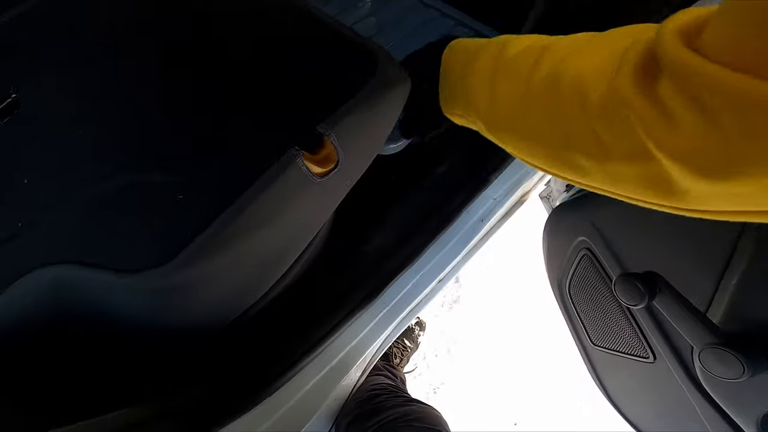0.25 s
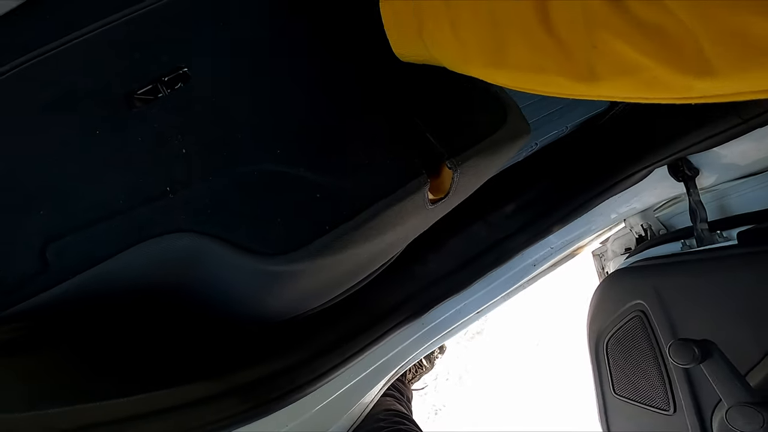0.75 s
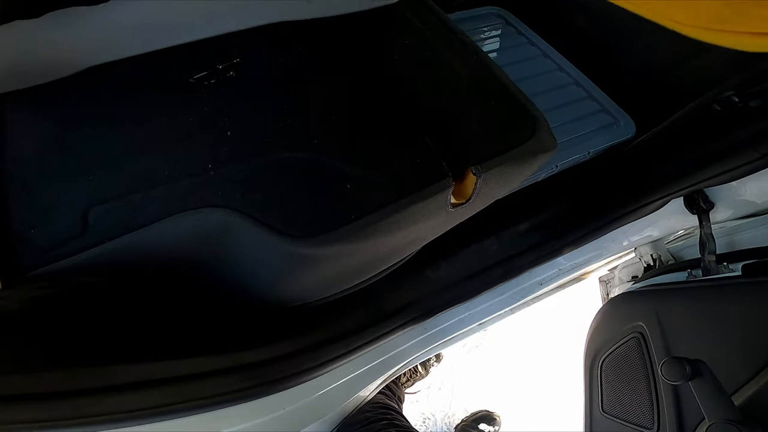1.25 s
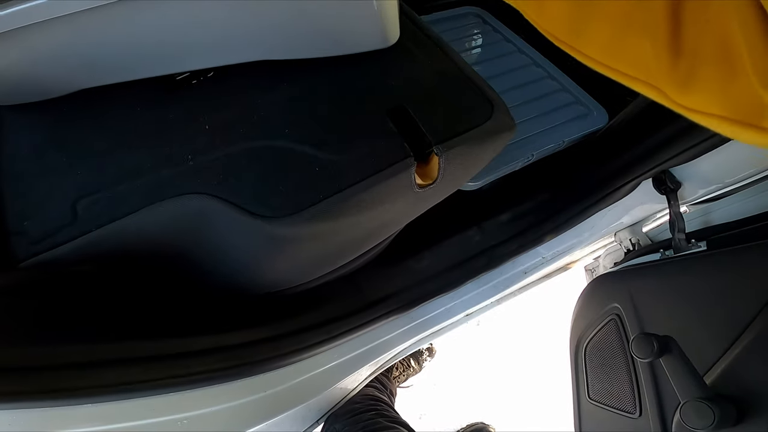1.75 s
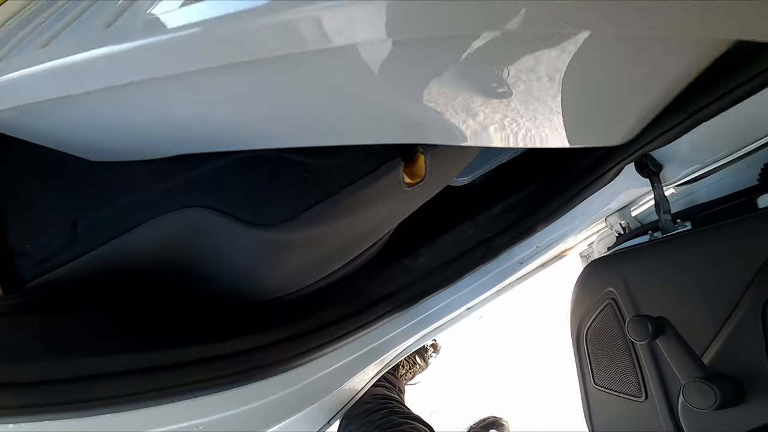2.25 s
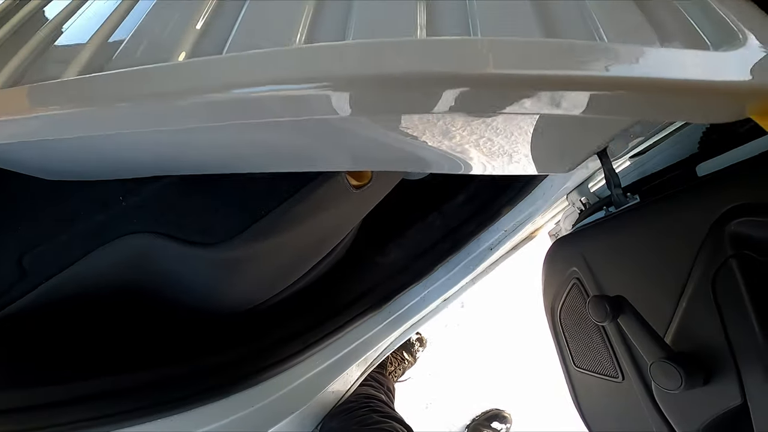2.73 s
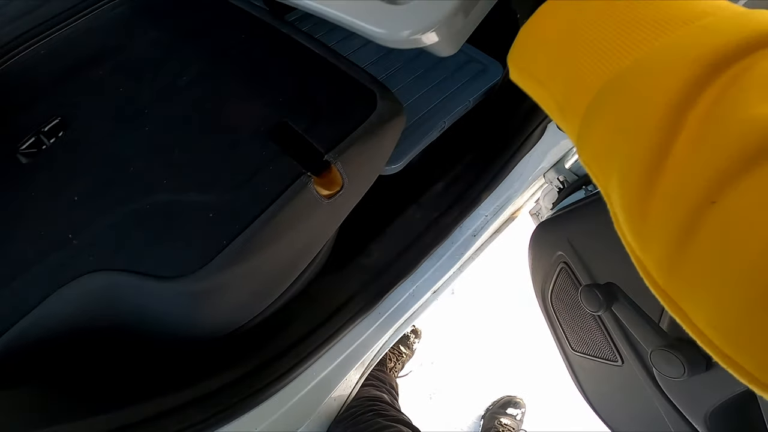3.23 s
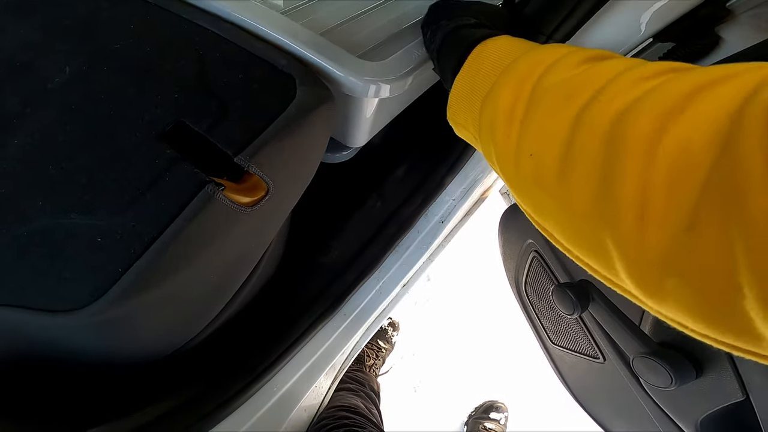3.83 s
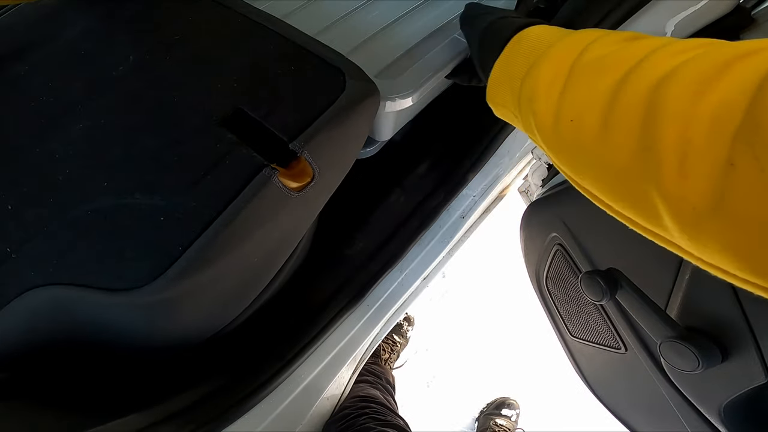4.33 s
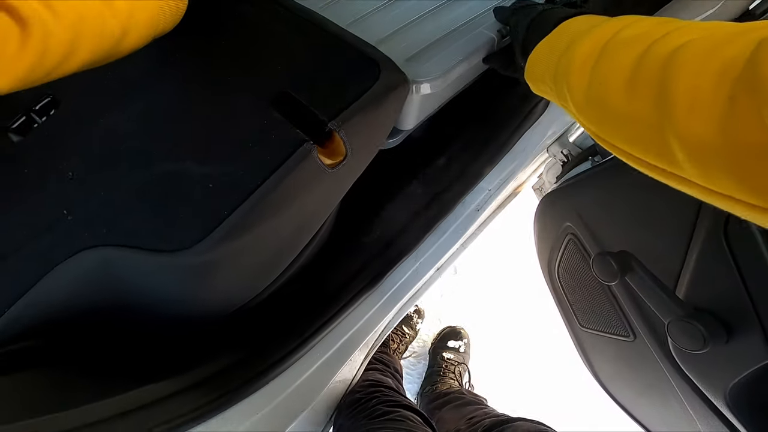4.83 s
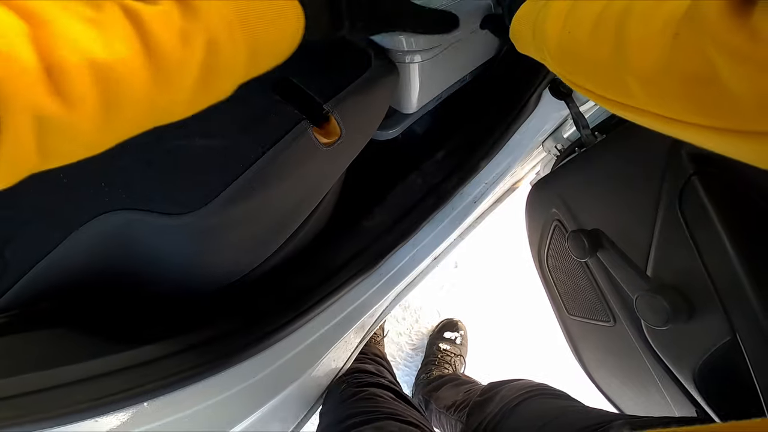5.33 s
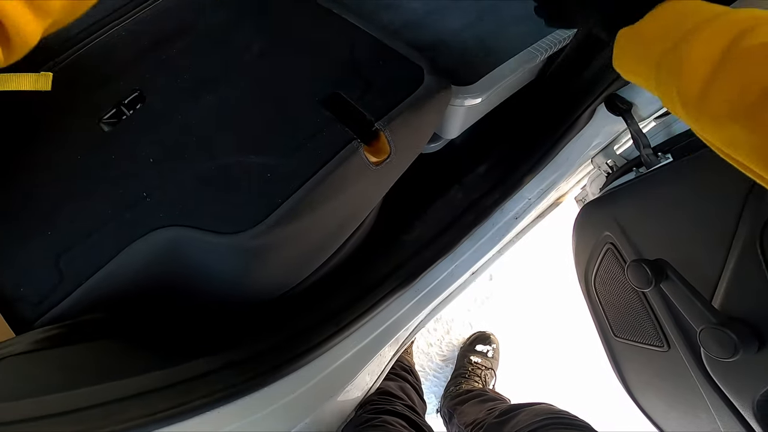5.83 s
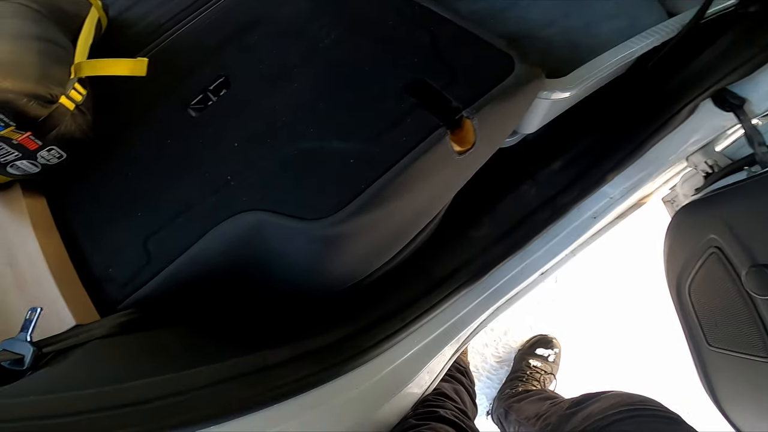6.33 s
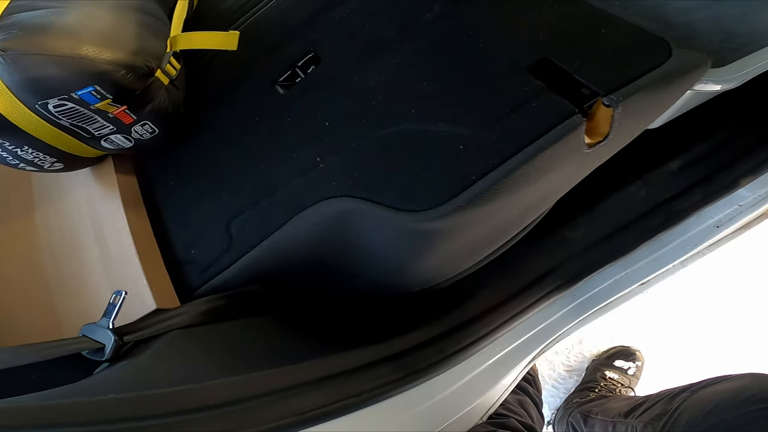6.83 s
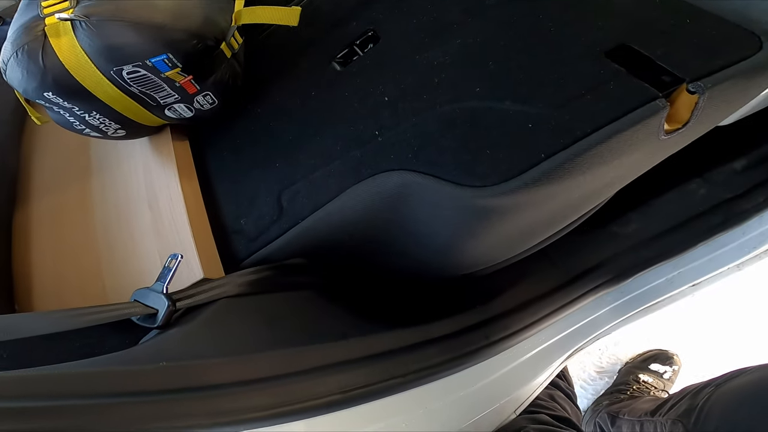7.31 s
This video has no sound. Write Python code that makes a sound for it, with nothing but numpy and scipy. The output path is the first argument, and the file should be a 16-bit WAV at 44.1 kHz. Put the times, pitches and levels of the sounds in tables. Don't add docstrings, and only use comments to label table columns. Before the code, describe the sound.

Hollow plastic cracks and dull panel thumps as a crate is handled onto a car floor, close up, with low air rumble and small ticks.

```python
import sys
import numpy as np
from scipy import signal
from scipy.fft import rfft, irfft, next_fast_len
from scipy.io import wavfile

SR = 44100
rng = np.random.default_rng(int(sys.argv[2]) if len(sys.argv) > 2 else 0)


def wav_record(signal):
    frames = np.transpose(np.atleast_2d(signal))
    bounded = np.clip(frames, -1, 1)
    quanta = np.round(bounded * 32767).astype(np.int16)
    wavfile.write(sys.argv[1], SR, quanta)


def voltage_ratio(level):
    return 10 ** (np.asarray(level, float) / 20)


N = 333837

# f/Hz, level/dB per Hz
AIR_COLOUR = [(8.8, -41.5), (15, -1), (38, 4), (59, -3.5), (90, -9), (120, -45), (200, -120)]
# t/s, level/dB
BODY_SWAY = [(0.0, -15), (0.55, -55.5), (1.07, -27), (2.04, -43.5), (2.55, -34), (3.2, -48), (3.27, -19),
             (3.44, -39), (3.84, -37.5), (4.03, -53.5), (4.15, -25), (4.53, -52), (5.69, -43),
             (5.86, -21.5), (6.68, -63), (7.0, -41.5), (7.49, -54.5), (7.57, -38)]
# t/s, level/dB, f/Hz, t60/s
FLOOR_BOB = (2.452, -18, 31.5, 1.4)
# t/s, level/dB, swell/s, t60/s
METAL_RINGS = [(.086, -45, .012, .7), (.086, -47, .008, .15), (2.358, -46, .02, .02),
               (2.358, -53, .018, .03), (3.374, -38, .002, .05), (3.374, -40, .002, .035),
               (6.049, -43, .01, .05), (6.054, -50, .008, .05), (6.29, -66, .07, .05),
               (4.283, -63, .02, .2), (.168, -58, .008, .12), (.235, -60, .04, .06), (.078, -48, .015, .02)]
METAL_PITCHES = [1650, 3620, 7700, 10450, 5905, 8446, 3639, 8220, 1490, 1900, 3620, 960, 1450]
# t/s, peak level/dB, f/Hz
PART_TICKS = [(0.109, -36, 3840), (.109, -34, 2400), (.145, -43, 3000), (.152, -39, 3480),
              (0.254, -50, 4000), (.273, -46, 1800), (.325, -53, 1920), (4.898, -34, 740),
              (4.912, -29, 1050), (4.918, -34, 1460), (6.286, -44.5, 637), (6.313, -40, 600),
              (6.326, -47, 616), (6.344, -39.5, 620), (6.389, -49, 1000), (4.769, -54, 900),
              (4.448, -55, 1560), (6.29, -52, 1440), (6.596, -37.5, 1220), (6.746, -48, 1960),
              (6.799, -43.5, 1420), (6.964, -40.5, 1320), (7.194, -42.5, 1600), (5.681, -17.5, 4650)]
# t/s, weight on the floor level/dB, arm movement level/dB
STEADY_HANDLING = [(0, -36, -49.5), (.2, -45.5, -66.5), (.28, -54.5, -70), (.4, -57.5, -77.5),
                   (.54, -61.5, -75), (.6, -53.5, -69.5), (1.0, -46.5, -57.5), (2.3, -52, -62.5),
                   (2.63, -57, -62), (3.29, -47, -63.5), (3.86, -49.5, -58), (4.02, -62, -81.5),
                   (4.5, -58.5, -75.5), (4.9, -51.5, -72.5), (6.0, -41.5, -60), (6.25, -54.5, -73.5),
                   (6.9, -50, -67), (7.57, -48, -70)]
# start t/s, length/s, dragging level/dB, jacket rustle level/dB
PUSH_STROKES = [(0.044, 0.18, -26.5, -61), (0.53, 0.19, -71, -64.5), (1.094, 0.19, -71, -60),
                (1.257, 0.38, -52, -62.5), (1.73, 0.29, -45, -50), (2.02, 0.43, -50, -54),
                (2.353, 0.14, -42, -45), (2.472, 0.18, -45, -57), (2.654, 0.37, -43, -59),
                (2.777, 0.16, -44, -83), (3.311, 0.15, -48, -43.5), (3.442, 0.18, -29.5, -47),
                (3.588, 0.12, -57, -47), (3.686, 0.16, -34, -49), (3.86, 0.17, -41.5, -52.5),
                (4.025, 0.32, -42.5, -53.5), (4.123, 0.19, -33.5, -70), (4.605, 0.14, -81.5, -66.5),
                (4.954, 0.2, -48.5, -52), (5.123, 0.18, -71, -56), (5.241, 0.27, -49, -53),
                (5.453, 0.18, -45, -59), (5.501, 0.26, -37, -47), (5.64, 0.23, -43, -53),
                (5.754, 0.26, -53, -55.5), (6.347, 0.39, -85, -62.5), (6.952, 0.13, -50.5, -69)]
# f/Hz, level/dB per Hz
JACKET_COLOUR = [(760, -8.5), (1300, -6), (1970, -8.5), (3050, -9), (3830, -9.5), (4920, -11.5),
                 (7010, -18), (8450, -17.5), (10400, -24.5), (12900, -31.5), (15600, -35.5)]
# f/Hz, width/Hz, level/dB re the rustle
JACKET_FOLDS = [(1204, 760, 2.5), (2480, 870, 0), (3636, 370, -3.5), (4300, 550, -3), (8400, 660, -4.5),
                (5280, 1000, -4.5), (6500, 1400, -2.5)]
# start t/s, length/s, centre f/Hz, level/dB
SLEEVE_SWISHES = [(0.993, 0.092, 2500, -61), (1.192, .23, 4300, -59.5), (1.231, 0.2, 5400, -66),
                  (4.882, .045, 990, -53.5), (1.44, 0.026, 4600, -54.5), (4.123, 0.054, 4160, -45.5),
                  (5.084, 0.092, 4000, -55), (5.302, .09, 4000, -53), (5.256, 0.1, 1030, -52.5),
                  (5.588, .22, 4240, -51.5), (5.875, .03, 4640, -37), (6.048, .02, 4320, -47.5)]
# f/Hz, level/dB per Hz
PANEL_COLOUR = [(26, -26.5), (45, -7), (76, -1.5), (125, -6), (172, -11), (275, -15), (450, -37.5),
                (580, -53.5), (990, -120)]
# f/Hz, level/dB per Hz
DRAG_COLOUR = [(160, -1), (280, -2), (530, -5), (724, -12.5), (846, -18.5), (958, -20.5), (1800, -33.5),
               (2340, -67.5), (3960, -120)]
# t/s, grit peak level/dB, dull part level/dB re grit, length/s
SHORT_SCUFFS = [(0.075, -31.5, 15, 0.057), (0.165, -46, 15, .025), (0.1714, -41.5, 28, 0.019),
                (0.663, -41, 6, 0.043), (1.435, -35.5, 2, 0.07), (1.607, -41, 9, 0.056),
                (1.633, -45.5, 20.5, 0.074), (1.764, -40.5, 9, 0.048), (2.329, -33.5, -6, 0.03),
                (2.364, -42.5, 27, 0.019), (2.957, -43.5, -7, 0.046), (3.026, -37.5, 2, 0.05),
                (3.23, -33, 10, 0.054), (3.256, -35.5, 12.5, 0.021), (3.403, -22.5, 8.5, 0.019),
                (3.537, -27.5, -5, 0.033), (3.6475, -30, 17, 0.036), (3.889, -40, 12, 0.064),
                (4.133, -33, 24.5, 0.051), (4.147, -15.5, -12, 0.026), (4.172, -14.5, 7, 0.026),
                (4.878, -46, 13.5, 0.14), (5.1, -32.5, -13, 0.12), (5.318, -46, 21.5, 0.094),
                (5.462, -41, 7, 0.051), (5.524, -30, 10, 0.034), (5.812, -29, 0, 0.034),
                (5.822, -17, 8, .022), (5.871, -28.5, -6, 0.052), (5.888, -17, 8, 0.011),
                (3.473, -30, 6, 0.053), (3.671, -41, -3, 0.045), (6.058, -33.5, 13.5, 0.03),
                (3.705, -35, -2, 0.059), (3.4, -37.5, 8, 0.095), (0.036, -44, 11, 0.1),
                (5.707, -34, -6, .1), (6.147, -55, -3, 0.099)]
# t/s, peak level/dB, f/Hz
SOFT_LIFT_BLOWS = [(.004, -10, 144), (.042, -10, 235), (0.076, -32, 74.4), (.168, -16, 182),
                   (0.553, -31, 101), (0.621, -35, 121), (.669, -22.5, 164), (0.899, -17.5, 71),
                   (1.102, -14.5, 87.4), (1.125, -16, 112), (1.144, -10.5, 115), (1.196, -12, 86),
                   (1.322, -18, 71.6), (1.401, -26.5, 115), (1.46, -28.5, 247), (1.559, -18, 82),
                   (1.796, -27.5, 226), (1.879, -20.5, 189), (1.932, -25.5, 251), (2.184, -28, 85.6),
                   (2.372, -17, 120), (2.415, -18.5, 110), (2.775, -16, 83.4), (2.855, -18.5, 171),
                   (3.035, -14.5, 204), (3.231, -18, 101)]
# t/s, peak level/dB, f/Hz
SOFT_SHOVE_BLOWS = [(3.401, -26, 168), (3.479, -8, 212), (3.496, -5.5, 171), (3.569, -20.5, 236),
                    (3.624, -21.5, 211), (3.645, -14, 111), (3.692, -5, 169), (3.723, -14, 109),
                    (3.899, -34, 209), (4.132, -15, 94), (4.151, -8.5, 177), (4.177, -16, 187),
                    (4.201, -8.5, 202), (4.809, -32.5, 187.6), (5.028, -35, 77.4), (5.34, -27, 176),
                    (5.372, -20.5, 215), (5.529, -34, 189), (5.563, -29, 86), (5.683, -16.5, 179.5),
                    (5.819, -15.5, 138.3), (5.879, -24, 79), (5.924, -11.5, 129), (5.958, -14, 149),
                    (7.084, -36.5, 203), (7.224, -28.5, 150), (2.959, -27, 279), (2.807, -16.5, 153),
                    (3.479, -18, 377)]
# f/Hz, level/dB per Hz
CRACK_COLOUR = [(710, -4), (1200, -5.5), (2070, -6.5), (4170, -7.5), (4900, -12.5), (5510, -14.5),
                (6470, -20.5), (8380, -21.5), (12600, -40.5), (15600, -33.5)]
# f/Hz, level/dB
WALL_MODES = [(330, 6.5), (410, 1.5), (510, 12), (620, 5.5), (750, -11), (960, -1), (1250, -1)]
# t/s, crack peak level/dB, wall ring level/dB re crack, top level/dB re crack
AIRBORNE_KNOCKS = [(.0014, -20, 3.5, -2.5), (.0426, -19, 5, -9), (1.1475, -26.5, 3, -3),
                   (1.4069, -34, -5, -31), (1.4801, -35, 13.5, 0), (1.5314, -30, 2, -16),
                   (1.5578, -27.5, 6, -9), (1.7947, -43, 17.5, -18), (1.8652, -15, -4, -17),
                   (1.879, -18.5, 5, -14), (1.931, -16, -0.5, -5), (2.2105, -30, 0, -14),
                   (2.382, -5.5, -6.5, -3.5), (2.4398, -28.5, 4.5, -10), (2.7796, -12.5, -7.5, -4),
                   (2.8572, -26, -6, -34)]
# t/s, crack peak level/dB, wall ring level/dB re crack, top level/dB re crack
FLOOR_KNOCKS = [(3.3732, -12.5, -1, -8), (3.4772, -9.5, 0, -7), (3.4979, -13, 5.5, -1),
                (3.5699, -28, 2, -19), (3.588, -25, -22.5, -8), (3.605, -20.5, -9, -9.5),
                (3.6928, -3.5, -9, -10), (3.704, -10, 2.5, -2), (4.1998, -8, -4, 3), (4.4792, -39, -5, -14),
                (4.816, -31.5, -13, -14), (4.835, -42, -13, 9), (5.3718, -28.5, 2, -18),
                (5.564, -27, 7, -14), (5.6818, -21.5, 3, -1), (5.925, -16.5, -5.5, -5),
                (5.9583, -16.5, -3.5, -8), (5.995, -38, 5.5, -31), (7.23, -33.5, 0, -37),
                (3.035, -36, -15, -7)]
# t/s, peak level/dB, f/Hz
SINGLE_WALL_RINGS = [(0.04, -12, 431), (0.67, -19.5, 339), (0.705, -31, 378), (0.899, -33.5, 570),
                     (1.324, -28.5, 364), (1.399, -27.5, 470), (1.481, -21, 618), (1.506, -32, 442),
                     (1.53, -32, 510), (1.722, -32, 554), (1.795, -28, 380), (1.865, -16, 650),
                     (1.88, -14.5, 500), (1.932, -17.5, 532), (1.946, -24, 510), (2.209, -22.5, 500),
                     (2.379, -17.5, 508), (2.779, -10.5, 388), (3.055, -28, 475), (2.857, -30, 302),
                     (3.032, -18.5, 457), (3.373, -12, 570), (3.4, -34, 423), (3.479, -4, 396),
                     (3.511, -9.5, 320), (3.571, -12.5, 442), (3.624, -18, 440), (3.702, -6.5, 368),
                     (4.138, -14.5, 353), (4.171, -16.5, 507), (4.202, -8, 384), (4.299, -38.5, 316),
                     (5.372, -31, 311), (5.68, -16, 324), (5.819, -23, 643), (5.957, -17, 517),
                     (6.065, -24, 486)]
# t/s, peak level/dB, f/Hz
STIFF_RIM_RINGS = [(0.043, -27, 1510), (1.8647, -24, 1020), (1.9309, -15.5, 1480), (2.2084, -39, 1160),
                   (2.3803, -9.5, 1250), (2.7779, -20.5, 1040), (2.8569, -34.5, 1120), (3.374, -20, 990),
                   (3.605, -31, 1320), (3.6918, -9, 1190), (3.702, -10, 1340), (4.1325, -31, 1038),
                   (4.2016, -16.5, 980), (4.2114, -24, 1470), (5.7793, -35, 1140)]
# t/s, peak level/dB, f/Hz
HARD_OVERTONES = [(.006, -12.5, 397), (.022, -8, 355), (.09, -24, 697), (.12, -25, 410), (.669, -34.5, 690),
                  (2.381, -15, 1640), (2.381, -17, 2470), (2.381, -21.5, 5500), (2.779, -20.5, 750),
                  (2.21, -22.5, 248), (3.694, -5.5, 394), (3.724, -15, 377), (3.745, -24, 420),
                  (3.93, -29, 480), (6.064, -36, 1350), (4.132, -33.5, 1280), (4.2, -19.5, 1570),
                  (4.2, -19, 4300), (4.225, -16, 320), (4.25, -33.5, 300), (5.683, -35, 4450),
                  (5.886, -40, 4300), (5.924, -11, 323), (5.87, -32.5, 310), (7.45, -33, 303),
                  (3.478, -24, 3900), (5.335, -37, 906)]
# t/s, peak level/dB, f/Hz
FLOOR_REBOUNDS = [(0.017, -15, 131), (0.061, -2.5, 184), (0.553, -25, 154), (0.701, -10, 132),
                  (3.407, -10, 205), (3.506, -8, 147), (3.738, -8, 132), (3.93, -24, 210), (4.217, -6, 203),
                  (4.236, -14, 141), (5.694, -15, 250), (2.828, -13, 149), (5.835, -14, 132),
                  (5.98, -23, 132)]
# t/s, peak level/dB, centre f/Hz
EDGE_SNAPS = [(0.5521, -57, 2200), (0.6674, -43, 3840), (1.1253, -48, 2390), (1.4082, -41, 2090),
              (1.6008, -51, 3020), (1.9464, -29, 2920), (2.5217, -39, 2310), (2.9706, -42, 4660),
              (3.1577, -44, 1800), (3.2395, -35, 2080), (3.314, -42, 1250), (3.5644, -42, 2260),
              (3.5887, -30, 3540), (3.6047, -29, 2740), (3.6536, -25, 3170), (3.8856, -41.5, 4030),
              (4.816, -37.5, 3500), (5.5308, -40, 3320), (5.8202, -19, 2480), (5.8354, -38, 2220),
              (5.886, -26.5, 4380), (5.9234, -25, 3300)]


def rms_one(x):
    return x / np.sqrt(np.mean(x ** 2) + 1e-20)


def seconds(length_s):
    return np.arange(int(length_s * SR)) / SR


def add(track, s, piece):
    i = round(s * SR)
    piece = piece[max(-i, 0):N - i]
    track[max(i, 0):max(i, 0) + len(piece)] += piece


def in_time(rows):
    s, *columns = np.transpose(rows)
    return [np.interp(np.arange(N) / SR, s, column) for column in columns]


def split(x, hz):
    low = signal.sosfiltfilt(signal.butter(2, hz, fs=SR, output="sos"), x)
    return low, x - low


def drift(rate):
    r = np.exp(-40 * np.pi * rate / SR)
    chance = rng.standard_normal(N // 20 + 2002)
    slow = signal.lfilter([1], [1, -2 * r, r * r], chance)[2000:]
    return np.interp(np.arange(N) / 20, np.arange(len(slow)), rms_one(slow))


def grains(per_s, spread_db):
    sizes = voltage_ratio(spread_db * np.minimum(rng.exponential(1, N), 4))
    signs = rng.choice([-1, 1], N)
    return rms_one(sizes * signs * (rng.random(N) < per_s / SR))


def coloured(spectrum, source, patchy_db, flicker_per_s):
    hz, db = np.transpose(spectrum)
    size = next_fast_len(N, real=True)
    octave = np.log2(np.arange(1, size // 2 + 2) * SR / size)
    shaped = rfft(source, size) * voltage_ratio(np.interp(octave, np.log2(hz), db, right=-150))
    out, together = 0, drift(flicker_per_s)
    for centre in np.arange(np.log2(hz[0]), np.log2(hz[-1]), .5):
        band = irfft(shaped * np.maximum(1 - 2 * abs(octave - centre), 0), size)[:N]
        flicker = together + 1.28 * drift(flicker_per_s)
        out = out + voltage_ratio(patchy_db * flicker) * band
    return rms_one(out)


def struck(rows, base_s, cycles, rise_cycles, trim_db):
    out, t = np.zeros(N), seconds(1 / 8)
    for s, db, hz in rows:
        rise = 1 - np.exp(-t * hz / rise_cycles)
        decay = voltage_ratio(db + trim_db - 60 * t / (base_s + cycles / hz))
        add(out, s, rise * decay * np.sin(2 * np.pi * hz * t))
    return out


def efforts():
    drag, jacket = voltage_ratio(in_time(STEADY_HANDLING))
    rise, fall = 0.56, 0.8
    for s, length, drag_db, jacket_db in PUSH_STROKES:
        phase = np.linspace(0, 1, int(np.clip(length, .03, .6) * SR))
        shape = np.clip(np.minimum(phase / rise, (1 - phase) / fall), 0, 1) ** 0.81
        add(drag, s, voltage_ratio(drag_db) * shape)
        add(jacket, s, voltage_ratio(jacket_db) * shape)
    return drag, jacket


def moving_air():
    air_db, = in_time(BODY_SWAY)
    return voltage_ratio(air_db - 0.5) * coloured(AIR_COLOUR, rng.standard_normal(N), patchy_db=-1.5, flicker_per_s=1.17)


def cabin(x):
    t60_s, seat_cut_hz = 0.059, 1700
    t = seconds(1 / 4)
    tail = rng.standard_normal(len(t)) * voltage_ratio(-60 * t / t60_s) * (t > .003)
    tail = signal.lfilter(*signal.butter(1, seat_cut_hz, fs=SR), tail)
    return signal.fftconvolve(x, tail / np.sqrt(np.sum(tail ** 2)))[:N]


def suspension():
    out, t = np.zeros(N), seconds(1 / 3)
    s, db, hz, t60 = FLOOR_BOB
    swell = np.sin(np.pi * t / t[-1]) ** 0.24
    add(out, s, voltage_ratio(db - 60 * t / t60) * np.sin(2 * np.pi * hz * t) * swell)
    return out


def metal_hardware():
    out, t, unsteady = np.zeros(N), seconds(1 / 4), drift(60)
    for (s, db, swell, t60), hz in zip(METAL_RINGS, METAL_PITCHES):
        rise = np.minimum(t / swell, 1) ** .2
        hushed = np.clip((.13 - t) / .03, 0, 1)
        decay = voltage_ratio(db - 60 * np.maximum(t - swell, 0) / t60)
        wobble = .5 * unsteady[-int(hz) - len(t):-int(hz)]
        add(out, s, rise * hushed * decay * np.sin(2 * np.pi * hz * t + wobble))
    return out * voltage_ratio(3 * unsteady)


def ticks():
    out, t = np.zeros(N), seconds(1 / 20)
    for s, db, hz in PART_TICKS:
        ring = np.sin(2 * np.pi * hz * t) + 0.11 * np.sin(2 * np.pi * 1.42 * hz * t)
        decay = voltage_ratio(db - 60 * t / (0.0042 + 9 / hz))
        add(out, s, ring * decay * (1 - np.exp(-t / 0.000062)))
    return out


def folds(cloth):
    out = cloth.copy()
    for hz, width_hz, db in JACKET_FOLDS:
        b, a = signal.iirpeak(hz, hz / width_hz, fs=SR)
        out += voltage_ratio(db - 5 + 4.5 * drift(3.9)) * signal.lfilter(b, a, cloth)
    return rms_one(out)


def jacket_rustle(arms):
    source = rng.standard_normal(N) + .5 * grains(400, 3.5)
    cloth = coloured(JACKET_COLOUR, source, patchy_db=1.1, flicker_per_s=18)
    soft, crisp = split(folds(cloth), hz=5500)
    crisp_loss = 0.12
    crisp = crisp * voltage_ratio(-1) * (arms / voltage_ratio(-57.0)) ** -crisp_loss
    return voltage_ratio(0.2) * arms * (soft + crisp)


def crinkles(arms):
    per_s, level_db = 230, -13
    born = rng.random(N) < per_s * voltage_ratio(7.0 * drift(7.0)) / SR
    sizes = born * voltage_ratio(3.6 * np.minimum(rng.exponential(1, N), 4)) + 1e-18
    dealt, out = rng.integers(0, 8, N), 0
    for k, hz in enumerate(np.geomspace(1200, 7500, num=8)):
        b, a = signal.iirpeak(hz, 3.0, fs=SR)
        out = out + signal.lfilter(b, a, sizes * (dealt == k)) * (hz / 3000) ** -.6
    return voltage_ratio(level_db) * arms * rms_one(out)


def swishes():
    out, rub = np.zeros(N), grains(6000, 3.5)
    for s, length, hz, db in SLEEVE_SWISHES:
        size, i = int(np.clip(length, .02, .3) * SR), int(s * SR)
        hiss = signal.lfilter(*signal.iirpeak(hz, 4.5, fs=SR), rub[i:i + size])
        swell = np.sin(np.linspace(0, np.pi, size)) ** 0.47
        add(out, s, voltage_ratio(db) * rms_one(hiss) * swell)
    return out


def shake():
    out, t = np.zeros(N), seconds(1 / 2)
    shake_db, t60_s = -18, 0.46
    for s, db, _ in SOFT_LIFT_BLOWS + SOFT_SHOVE_BLOWS:
        add(out, s, voltage_ratio(db + shake_db - 60 * t / t60_s) * (1 - np.exp(-t / 0.0057)))
    return out


def panel_rumble(weight):
    panels = coloured(PANEL_COLOUR, rng.standard_normal(N), patchy_db=3.5, flicker_per_s=14.7)
    return (voltage_ratio(3.5) * weight + shake()) * panels


def thumps():
    out, t, rows = np.zeros(N), seconds(1 / 3), SOFT_LIFT_BLOWS + SOFT_SHOVE_BLOWS
    for (s, db, hz), luck in zip(rows, rng.standard_normal((len(rows), 4))):
        t60 = 0.026 + 5.27 / hz
        below_hz = hz * (.66 + .05 * luck[0])
        above_hz = hz * (1.563 + 0.16 * luck[2])
        main = np.sin(2 * np.pi * hz * t) * voltage_ratio(-60 * t / t60)
        below = np.sin(2 * np.pi * below_hz * t + luck[1]) * voltage_ratio(-13 - 50 * t / t60)
        above = np.sin(2 * np.pi * above_hz * t + luck[3]) * voltage_ratio(-6.0 - 70 * t / t60)
        rise = 1 - np.exp(-t * hz * 1.84)
        add(out, s, voltage_ratio(db + 9.5) * (main + below + above) * rise)
    return out


def crate_drag(weight):
    source = rng.standard_normal(N) + 0.46 * grains(300, 0.98)
    return voltage_ratio(1.0) * weight * coloured(DRAG_COLOUR, source, patchy_db=3.0, flicker_per_s=8.0)


def scuffs(grit, top_grit):
    t, top_db = seconds(1 / 5), -14.5
    bright, top, dull = np.zeros((3, N))
    for s, db, dull_db, length in SHORT_SCUFFS:
        phase = t / (0.24 * np.clip(length, .008, .1))
        swell = phase ** 1.14 * np.exp(1.51 * (1 - phase))
        for track, part_db in ((bright, db), (top, db + top_db), (dull, db + dull_db)):
            add(track, max(s - .003, 0), voltage_ratio(part_db) * swell)
    source = rng.standard_normal(N) + .5 * grains(450, 5.9)
    rumble = coloured(DRAG_COLOUR, source, patchy_db=4.0, flicker_per_s=98)
    return voltage_ratio(-12) * (bright * grit + top * top_grit + dull * rumble)


def crate_rings():
    return (struck(SINGLE_WALL_RINGS, 0.01, cycles=8.9, rise_cycles=0.37, trim_db=3.0)
            + struck(STIFF_RIM_RINGS, 0.009, cycles=7.0, rise_cycles=1.0, trim_db=5.0)
            + struck(HARD_OVERTONES, .012, cycles=11.0, rise_cycles=0.56, trim_db=2.0)
            + struck(FLOOR_REBOUNDS, 0.032, cycles=1.7, rise_cycles=0.88, trim_db=1.5)
            + struck(EDGE_SNAPS, 0.0022, cycles=6.8, rise_cycles=0.073, trim_db=2.0))


def knocks(grit, top_grit):
    lead_s, t60 = .012, 0.02
    t = seconds(1 / 5) - lead_s
    after = np.maximum(t, 0)
    crack, top, walls = np.zeros((3, N))
    rise = 1 - np.exp(-(after / 0.0013) ** 2)
    approach = voltage_ratio(-21 + 720 * np.minimum(t, 0)) * (1 - rise)
    crack_decay = voltage_ratio(-60 * after / t60) + voltage_ratio(-41.0 - 25 * after / t60)
    top_decay = voltage_ratio(-100 * after / t60)
    rows = AIRBORNE_KNOCKS + FLOOR_KNOCKS
    lucks = rng.standard_normal((len(rows), 2, len(WALL_MODES)))
    for (s, db, wall_db, top_db), luck in zip(rows, lucks):
        start = s - lead_s
        add(crack, start, voltage_ratio(db) * (approach + rise * crack_decay))
        add(top, start, voltage_ratio(db + top_db + 2.0) * (.25 * approach + rise * top_decay))
        for (hz, mode_db), (strength, detune) in zip(WALL_MODES, luck.T):
            peak_db = db + wall_db + mode_db - 14.0 + 0.96 * strength
            decay = voltage_ratio(peak_db - 60 * after / (t60 + 12 / hz))
            mode = np.sin(2 * np.pi * hz * (1 + 0.083 * detune) * after + strength)
            add(walls, start, rise * decay * mode)
    return voltage_ratio(-7.0) * (crack * grit + top * top_grit) + walls


def scene():
    source = rng.standard_normal(N) + .5 * grains(1400, 0.71)
    rough = coloured(CRACK_COLOUR, source, patchy_db=2.5, flicker_per_s=19.3)
    grit, top_grit = map(rms_one, split(rough, hz=6000))
    weight, arms = efforts()
    cloth = jacket_rustle(arms) + crinkles(arms) + swishes()
    handling = moving_air() + cloth + panel_rumble(weight) + crate_drag(weight)
    blows = suspension() + metal_hardware() + ticks() + thumps()
    blows = blows + scuffs(grit, top_grit) + crate_rings() + knocks(grit, top_grit)
    reflections = voltage_ratio(-18) * cabin(blows)
    return (handling + blows + reflections)[None]


def top_cut(x):
    return signal.sosfilt(signal.butter(12, 15760, fs=SR, output="sos"), x)


def record(dry):
    rounded = .95 * np.tanh(dry / .95)
    return top_cut(rounded)


dry = scene()
out = record(dry)
wav_record(out)
```